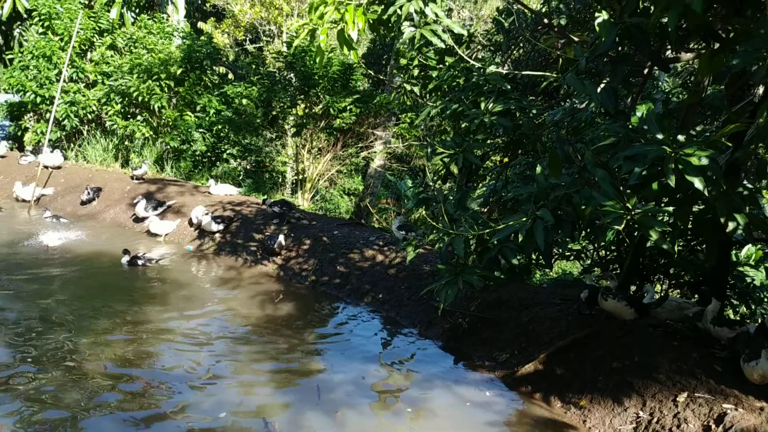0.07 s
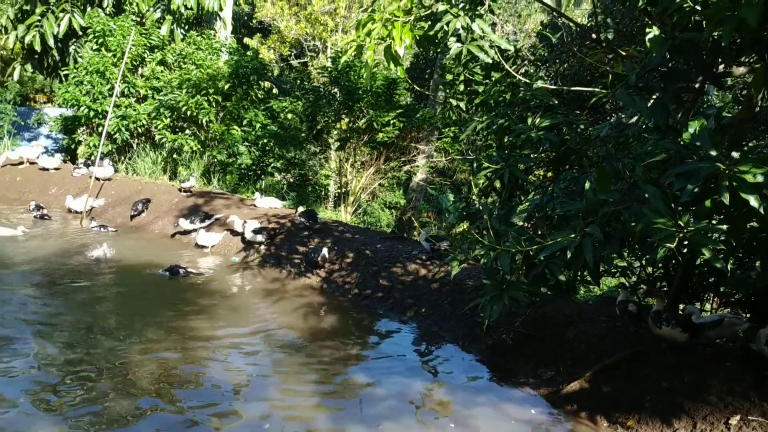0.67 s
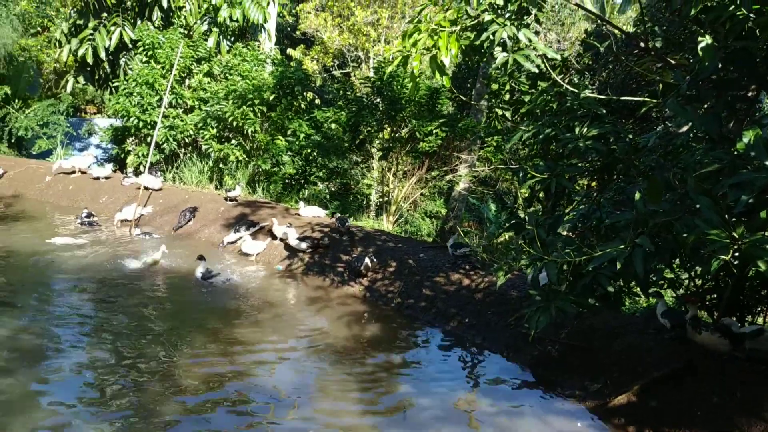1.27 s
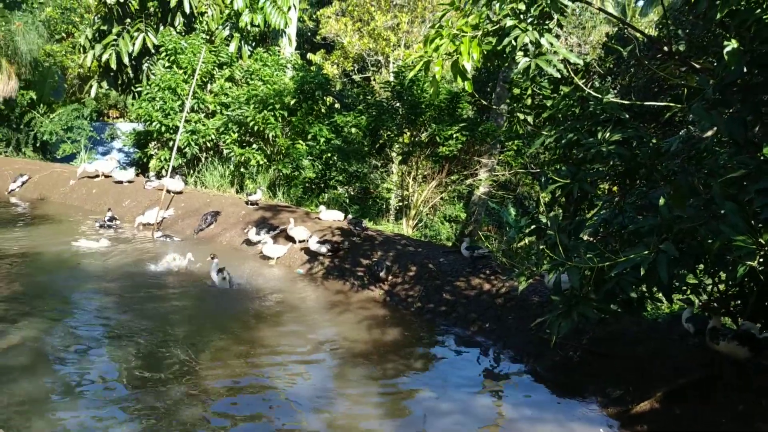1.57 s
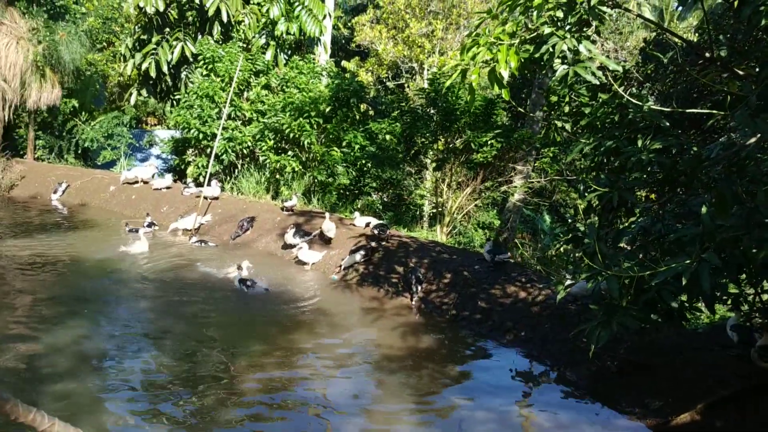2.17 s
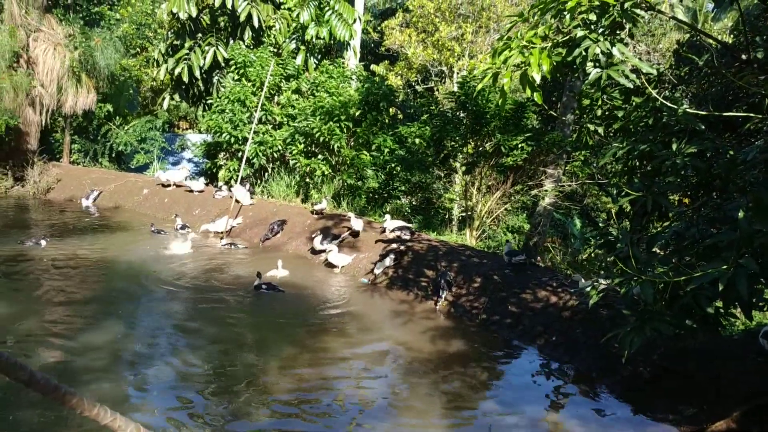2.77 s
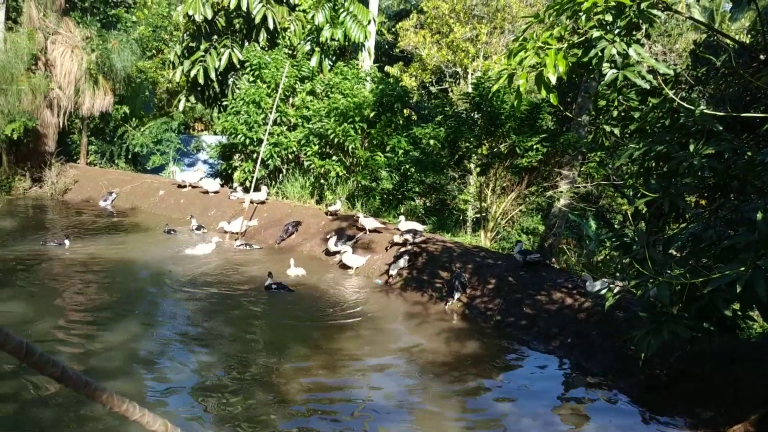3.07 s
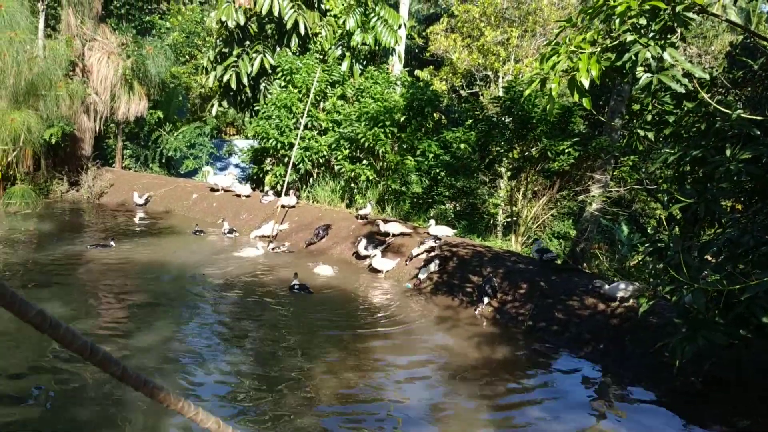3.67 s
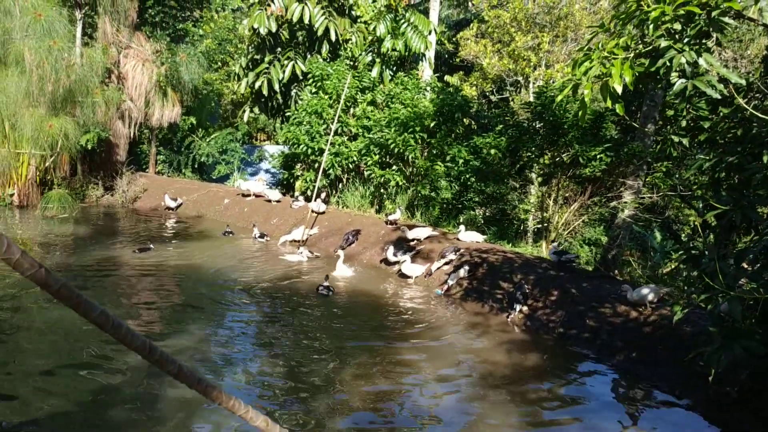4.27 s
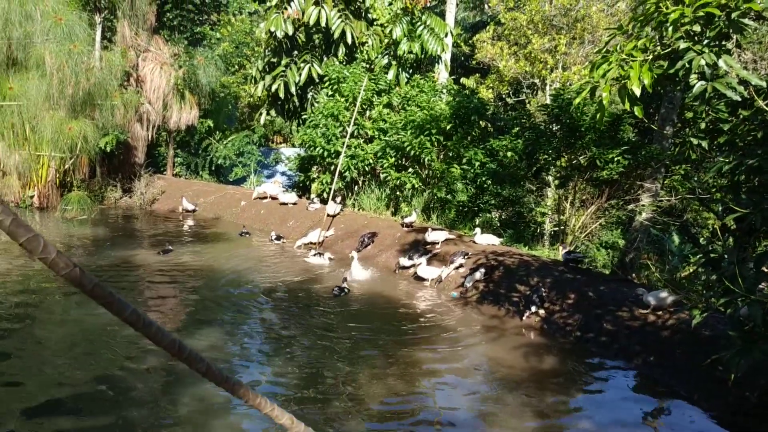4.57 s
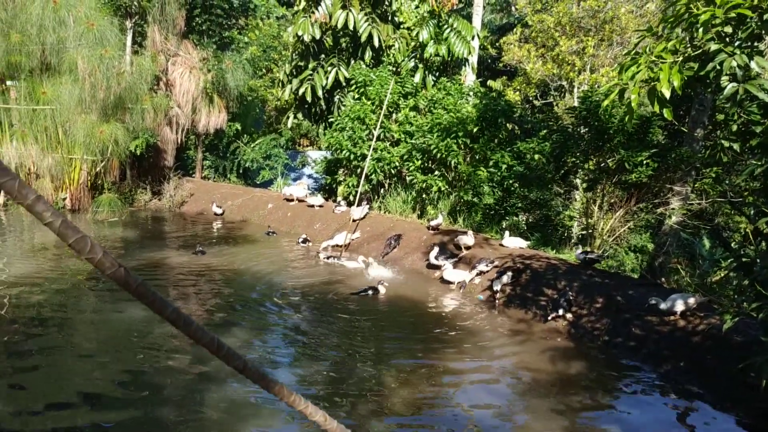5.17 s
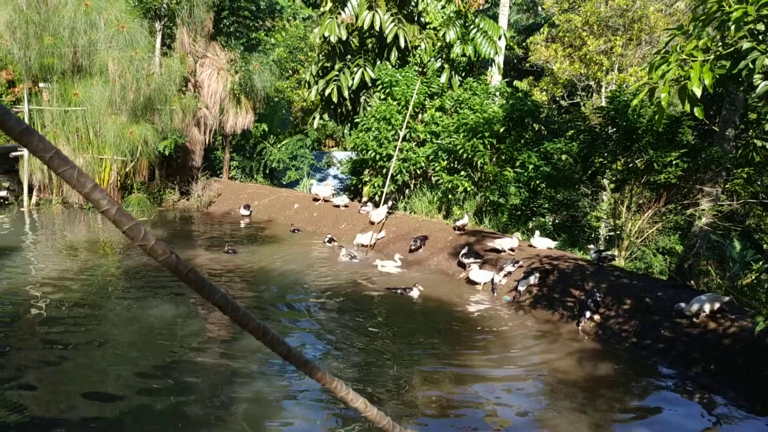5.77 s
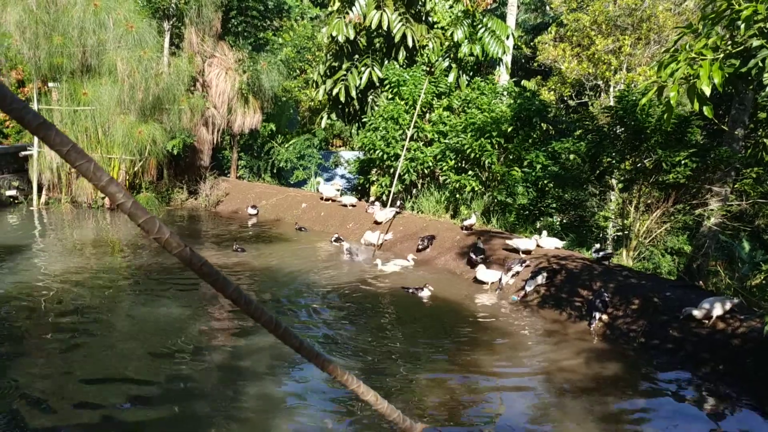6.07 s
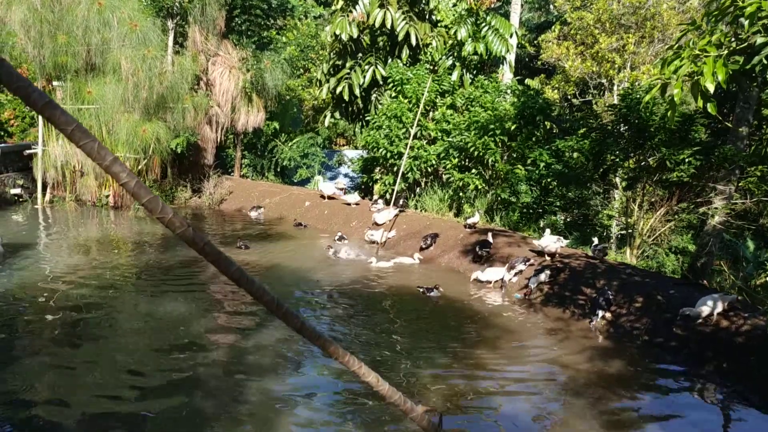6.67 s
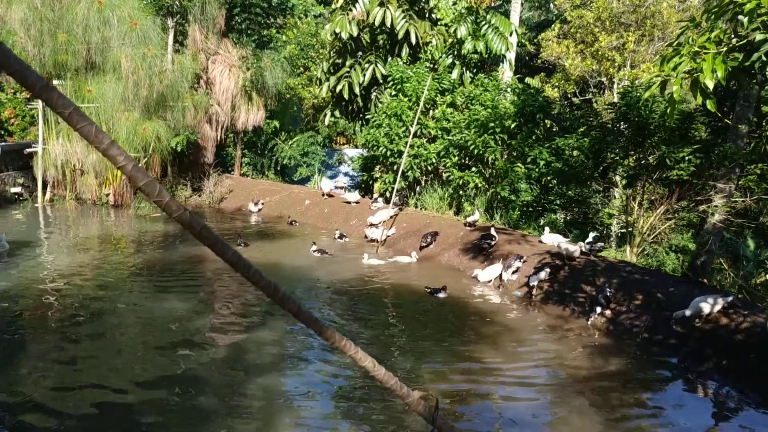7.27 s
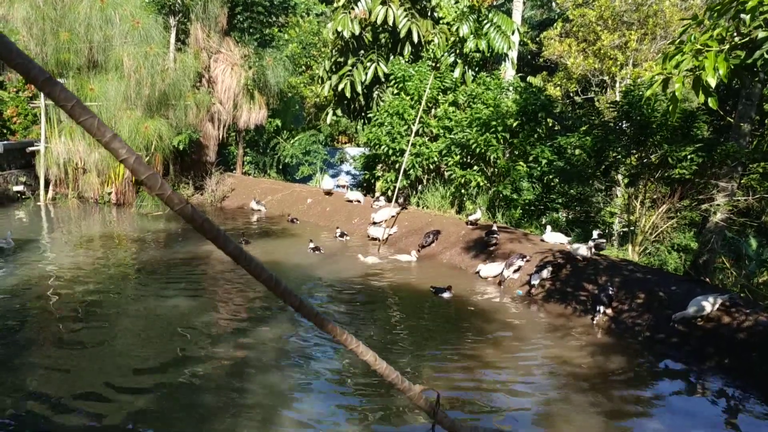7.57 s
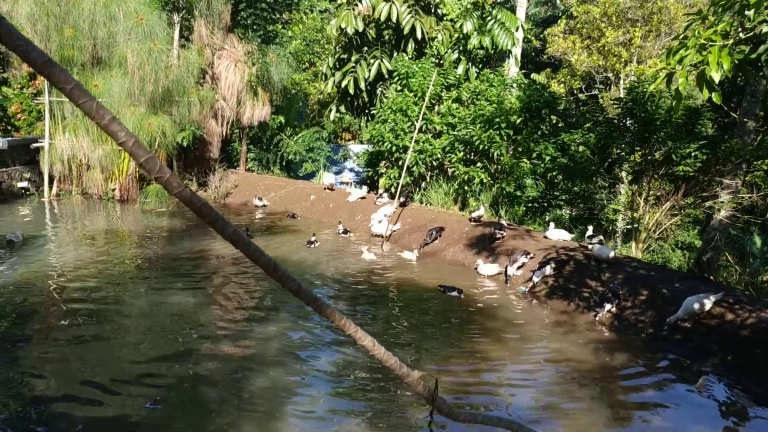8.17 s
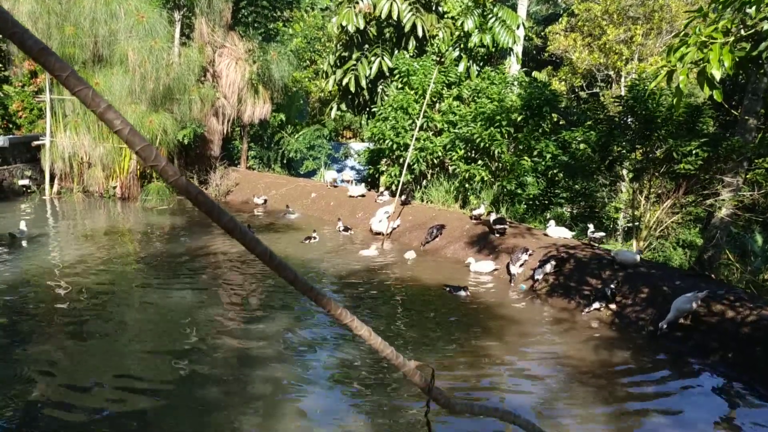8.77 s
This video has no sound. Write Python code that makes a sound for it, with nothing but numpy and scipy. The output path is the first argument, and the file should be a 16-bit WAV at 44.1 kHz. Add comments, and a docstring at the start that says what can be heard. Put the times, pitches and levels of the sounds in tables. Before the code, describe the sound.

Ducks bathe in a pond, their wings slapping the water in four quick bouts with spray, sharp smacks, sloshes and bubbly plops. The first bout is the loudest, and light dabbling fills the gaps. Midway a small bird gives a slowing row of thin, high, rising chirps. Air hisses steadily in the trees behind it all, heard in stereo with a slight echo off the banks.

```python
"""A pond, with ducks bathing at the far side. In four bouts their wings beat the water about eight times
a second: wet slaps and sharp smacks, with spray and gulps made of tiny ringing bubbles. Dipping bodies
slosh and big air pockets plop. A small bird calls a slowing row of thin rising chirps, other birds
whistle and hoot faintly, and behind it all the air hisses steadily in the trees."""
import sys
import numpy as np
from scipy.fft import rfft, irfft, next_fast_len
from scipy.io import wavfile
from scipy.ndimage import map_coordinates

SR = 44100
rng = np.random.default_rng(int(sys.argv[2]) if len(sys.argv) > 2 else 0)


def dump_mix(stems):
    """Bounce the given channels to the path in sys.argv[1] as a 16-bit WAV at rate SR."""
    frames = np.atleast_2d(stems).T  # one column per channel
    limited = np.clip(frames, -1, 1)  # hard clip at full scale
    pcm = np.round(limited * 32767).astype(np.int16)
    wavfile.write(sys.argv[1], SR, pcm)


N = 388962

# Event levels are fader settings, ahead of each layer's own gain and echo.
# Stereo image of two close microphones: f/Hz, left-right likeness (clipped to +-0.99 in use)
LIKENESS = [(60, 4), (150, 1.2), (290, 1.02), (640, 0.5), (1400, -0.27), (3000, 0.06), (7000, 0)]
# Lean of the air and of the water: f/Hz, left minus right/dB
AIR_PAN = [(380, 1), (1300, 0.5), (2400, 2), (4400, 1.5), (8100, 2.5), (11000, -10), (15000, 0.5)]
WATER_PAN = [(200, -1), (700, 1), (1300, 4), (2400, 0), (4400, 7), (8100, 1.5), (15000, -1.5)]
# Bearing of the splashing duck: t/s, left delay/ms
DUCK_BEARING = [(0, 0.45), (3.4, 0.39), (3.9, 0.041), (5.2, 0.031), (8.8, 0.1)]
# Tone of the air, fine spray, underwater gulps, wing slaps, cracks and hollow claps: f/Hz, level/dB
AIR_EQ = [(30, -53), (95, -23), (140, -10.5), (200, 0.5), (340, -1.5), (500, 0), (950, -2), (1300, -4.5),
          (1650, 1), (3100, -3), (4500, -4), (7300, 0), (10500, -11.5), (15500, -12)]
SPRAY_EQ = [(400, -45), (1200, -13.5), (2200, 0), (3300, -4), (4600, -1), (6000, -4), (7500, 0),
            (10000, -3), (15500, -6.5)]
GULP_EQ = [(80, -50), (190, -4), (330, -10.5), (470, -2.5), (650, -6), (880, -1), (1250, -2.5),
           (1900, -0.5), (3500, -37), (8000, -45)]
SLAP_EQ = [(100, -47), (300, -13), (650, -3.5), (1300, -7), (2100, 0.5), (2800, -6.5), (4200, 3),
           (5500, -17), (7500, 3), (15000, -16)]
CRACK_EQ = [(60, -40), (200, -22), (1000, -9), (3000, -4), (4600, 0), (6500, -1.5), (9000, 1), (15500, -13)]
CLAP_EQ = [(80, -45), (250, -1), (600, -12), (1200, 7), (2200, -19), (4500, -1), (9000, -32)]
# Held notes of other birds: t/s, length/s, f/Hz, level/dB
HELD_NOTES = [(0.66, 0.21, 612, -47), (1.384, 0.107, 5980, -31.5)]
# The small bird's call: t/s, length/s, first f/Hz, top f/Hz, closing droop/Hz, level/dB
CHIRP_NOTES = [(3.539, .044, 7000, 7900, 150, -29), (3.645, 0.038, 7040, 7900, 80, -27),
               (3.761, 0.044, 6970, 7900, 350, -28), (3.884, .044, 7050, 7750, 280, -30),
               (4.02, 0.039, 6970, 7760, 0, -32), (4.172, 0.032, 7140, 8100, 0, -29),
               (4.313, .045, 6950, 8100, 0, -30), (4.499, .058, 6700, 8100, 0, -28.5),
               (4.695, .064, 6530, 8250, 0, -30), (4.926, 0.067, 6500, 8130, 0, -31.5),
               (5.206, .059, 6600, 8000, 0, -27), (5.515, 0.058, 6550, 8050, 0, -31),
               (5.903, .054, 6450, 7850, 0, -32.5)]
# Contour of every chirp: share of length, share of climb, level/dB
CHIRP_SHAPE = [(0, 0, -18), (0.12, 0.14, -10), (0.45, 0.6, -1), (0.6, 0.73, -5.5), (0.87, 0.95, -8.5),
               (1, 1, -24)]
# Big bubbles: t/s, f/Hz, level/dB
AIR_POCKETS = [(0.12, 259, -37), (0.982, 780, -25.5), (0.985, 524, -30), (0.987, 980, -29),
               (1.039, 820, -30), (1.135, 470, -34), (1.644, 840, -32), (1.848, 460, -30), (1.94, 550, -32),
               (2.353, 793, -32), (2.797, 274, -35), (2.828, 430, -36), (3.024, 1470, -29.5),
               (3.503, 1444, -31), (4.402, 224, -32.5), (4.587, 509, -28), (5.488, 223, -33),
               (5.603, 1000, -36), (7.608, 240, -35.5), (8.641, 496, -36), (8.748, 880, -39)]
# Water closing over a dipping body: t/s, decay/s, f/Hz, level/dB
BODY_DIPS = [(0.993, 0.02, 745, -32.5), (1.061, 0.023, 260, -40), (1.14, 0.038, 750, -34.5),
             (1.855, .01, 620, -30.5), (2.83, 0.047, 360, -36.5), (2.891, 0.018, 270, -41),
             (4.594, 0.011, 615, -39), (4.83, 0.014, 700, -36), (5.144, 0.0072, 620, -29),
             (5.153, .008, 260, -37), (5.645, 0.0092, 720, -37), (6.851, 0.0084, 720, -35),
             (7.6, .01, 600, -40), (7.795, 0.0089, 800, -41)]
# A wing or bill landing flat: t/s, crack level/dB, clap level/dB, crack peak f/Hz, crack decay/s
FLAT_HITS = [(0.065, -26, -42, 5500, .003), (0.902, -20, -36, 5700, .0015),
             (0.94, -11.5, -42, 4500, 0.0012), (0.974, -17, -44, 9600, 0.0013),
             (1.056, -20, -26, 4900, 0.0027), (1.129, -25, -34, 4400, .003),
             (1.188, -24, -36, 4600, 0.0018), (1.477, -15.5, -35, 5200, 0.0025),
             (1.5555, -15.5, -32, 4900, .0013), (1.683, -26, -32, 4500, .0015),
             (1.699, -21, -36, 5000, 0.0027), (1.807, -24, -40, 2330, 0.0027),
             (1.821, -25, -36, 3030, 0.0035), (1.938, -27, -23, 4580, 0.0044), (2.07, -20, -38, 3000, .003),
             (2.308, -27, -42, 4630, .004), (2.722, -28, -42, 6000, .004), (2.864, -16.5, -45, 4700, .0007),
             (2.87, -18, -40, 7860, .0007), (2.992, -26, -42, 8040, 0.0035), (3.12, -19, -34, 7000, .001),
             (3.256, -23, -35, 6500, .004), (3.4, -27, -45, 4700, .002), (4.178, -23, -50, 7400, .002),
             (4.7145, -17, -28, 3500, .001), (5.137, -19.5, -23.5, 1380, .0018),
             (5.144, -28, -38, 1210, .002), (7.456, -28, -40, 4280, 0.0035), (8.641, -23, -39, 3000, .0005)]
# A wing cutting into the water: t/s, level/dB, decay/s
WING_CUTS = [(0.222, -37, 0.018), (0.94, -22, 0.0023), (1.28, -32, .025), (1.405, -23.5, .01),
             (1.5555, -22.5, .006), (1.586, -25, .01), (1.698, -21.5, .008), (1.804, -22, .008),
             (2.047, -27, .004), (2.07, -28, 0.011), (2.575, -30, .008), (2.715, -31, .014),
             (2.97, -33, 0.011), (3.12, -31, 0.01), (3.213, -31, .012), (3.254, -31, .008),
             (3.399, -37, 0.0066), (3.925, -30, .006), (4.442, -31, .025), (4.59, -36, 0.011),
             (4.712, -24, .01), (4.732, -25, .01), (4.851, -28, 0.012), (4.99, -34, 0.011),
             (5.008, -30, .01), (5.138, -29, .008), (5.158, -28, 0.0082), (5.48, -29, .008),
             (5.553, -31, .009), (5.745, -31.5, 0.021), (5.856, -30, 0.013), (5.964, -28, .024),
             (6.065, -27.5, 0.019), (6.106, -32, .02), (6.197, -30.5, 0.036), (6.337, -29, .014),
             (6.358, -29, 0.014), (6.46, -26.5, 0.02), (6.582, -25.5, 0.018), (6.645, -27, .006),
             (6.701, -29, .028), (6.844, -32, 0.017), (7.456, -33, 0.0062), (7.785, -34, .01)]
# Bed of other ducks dabbling: t/s, spray level/dB, gulp level/dB
DABBLING = [(0, -41.5, -43), (0.3, -44, -43.5), (0.6, -47.5, -48), (1.2, -36, -36.5), (2.3, -43, -40),
            (2.5, -42.5, -47), (3.9, -41, -45.5), (5.5, -41, -46), (7.5, -42.5, -47.5), (8.3, -44, -51.5),
            (8.82, -41.5, -48.5)]
# Lone splashes and accents within a bout: t/s, spray level/dB, gulp level/dB, decay/s
PLUNGES = [(0.068, -34.5, -45, 0.055), (0.236, -39, -51, 0.022), (0.904, -35, -33, 0.022),
           (0.972, -33, -44, 0.02), (0.992, -43, -34, 0.024), (1.132, -37, -32, 0.035),
           (1.37, -45, -40, 0.022), (1.453, -27.5, -48, 0.02), (1.675, -28, -31.5, 0.027),
           (1.822, -26, -45, 0.036), (2.16, -33, -44, 0.073), (2.355, -39, -36, 0.025),
           (2.728, -33, -51, 0.02), (3.257, -34, -35, 0.012), (4.178, -32, -54, 0.021),
           (4.726, -31, -39, 0.032), (5.55, -42, -43, 0.14), (6.98, -38, -52, 0.033),
           (7.056, -39, -43, 0.027), (8.1, -37.5, -52, 0.041), (8.41, -44, -56, 0.02),
           (8.525, -40, -53, 0.013), (8.65, -45, -41, 0.02), (8.68, -40, -49, 0.015),
           (8.76, -45, -40, 0.02)]
# Bouts of wing beats: first t/s, last t/s, beats, slowing (0-1), spray level/dB, gulp level/dB,
# spray ramp/dB, gulp ramp/dB (both first beat to last), mid-bout swell/dB, churn level/dB
WING_BOUTS = [(0.934, 2.065, 10, 0, -32, -39.5, 1.5, -3, 0.5, -36),
              (2.36, 3.402, 9, 0.12, -37.5, -46, 0, -5, 2, -44),
              (4.462, 5.309, 7, 0.13, -36.5, -48.5, 0, -14, 4, -43.5),
              (5.753, 6.86, 10, 0.08, -37, -47, 5, 12, 2.5, -42.5)]


def amp(db):
    """Decibels to gain."""
    return 10 ** (np.asarray(db) / 20)


def unit(x):
    """x at rms 1."""
    return x / np.sqrt(np.mean(x ** 2) + 1e-20)


def along(points, hz):
    """(Hz, value) points read on a log axis."""
    f, v = np.transpose(points)
    return np.interp(np.log(hz + 1), np.log(f + 1), v)


def automation(rows):
    """One value per sample for each column after the time."""
    times, *columns = np.transpose(rows)
    return [np.interp(np.arange(N) / SR, times, column) for column in columns]


def wobble(rate):
    """A smooth random curve, rate knots a second."""
    knots = rng.standard_normal(int(N * rate / SR) + 4)
    coarse = np.arange(0, N, 32)
    return np.interp(np.arange(N), coarse, map_coordinates(knots, [coarse * rate / SR]))


def swell(u, rise=0.68):
    """Splash envelope peaking at u = 0; u and rise are counted in decay times."""
    return np.exp(np.minimum(u / rise, -u))


def filtered(x, response):
    """x through a frequency response."""
    m = next_fast_len(N + 8192)
    return irfft(rfft(x, m) * response(np.fft.rfftfreq(m, 1 / SR)), m)[..., :N]


def low_cut(x):
    """Steep roll-off below 160 Hz."""
    return filtered(x, lambda hz: 1 - 1 / (1 + (hz / 160) ** 6))


def add(track, s, sound):
    """Mix a sound into a track from time s."""
    part = track[max(round(s * SR), 0):][:len(sound)]
    part += sound[:len(part)]


def direct(x, lag_ms):
    """The straight path, reaching the left microphone later."""
    late = np.arange(N) - np.round(lag_ms * SR / 1000).astype(int)
    return np.array([x[np.clip(late, 0, N - 1)], x])


def banks(x, t60, block=4096):
    """Scattered echoes off the banks; water and birds move, so each block gets a fresh tail."""
    pieces = np.pad(x, (0, -N % block)).reshape(-1, block)
    t = np.arange(block) / SR
    tails = rng.standard_normal((2, len(pieces), block)) * amp(-60 * t / t60) * (1 - np.exp(-t / 0.0032))
    tails /= np.linalg.norm(tails, axis=-1, keepdims=True)
    echo = irfft(rfft(pieces, 2 * block) * rfft(tails, 2 * block))
    now, spill = echo[..., :block].reshape(2, -1), echo[..., block:].reshape(2, -1)
    return (now + np.pad(spill, ((0, 0), (block, 0)))[:, :-block])[:, :N]


def stereo_eq(pair, eq, pan):
    """Colour a pair, at rms 1; close microphones hear the bass alike, and each band leans to one side."""
    m = next_fast_len(N + 8192, True)
    hz = np.fft.rfftfreq(m, 1 / SR)
    left, right = rfft(pair.astype(np.float32), m)
    alike = np.clip(along(LIKENESS, hz), -.99, .99)
    mid, side = (left + right) * np.sqrt(1 + alike), (left - right) * np.sqrt(1 - alike)
    gain = amp(along(eq, hz) + np.outer([.5, -.5], along(pan, hz)))
    return unit(irfft(np.array([mid + side, mid - side]) * gain, m)[:, :N])


def air():
    """The bed: steady hiss in the trees, with a low murmur that swells and sinks."""
    murmur_eq = [(100, -45), (180, -4.5), (235, 0), (320, -8), (600, -31), (3000, -70)]  # f/Hz, level/dB
    hiss = stereo_eq(rng.standard_normal((2, N)), AIR_EQ, AIR_PAN)
    murmur = stereo_eq(rng.standard_normal((2, N)), murmur_eq, AIR_PAN)
    return hiss * amp(-36 + 0.15 * wobble(3.13)) + murmur * amp(-54 + 3.8 * wobble(14))


def whistles(scoop=0.05, waver=0.0039, rough_db=1.5):
    """Far birds hold slightly rough notes that scoop up to pitch, blurred by echoes."""
    track, unsteady = np.zeros(N), wobble(100)
    for s, length, hz, db in HELD_NOTES:
        u = np.linspace(0, 1, int(length * SR))
        pitch = hz * (1 - scoop * np.exp(-u / 0.152) + waver * unsteady[:len(u)])
        arch = np.abs(np.sin(np.pi * u)) ** 0.53
        add(track, s, amp(db) * arch * np.sin(2 * np.pi * np.cumsum(pitch) / SR))
    track *= amp(rough_db * wobble(300))
    return direct(track, lag_ms=0.19) + amp(-1) * banks(track, t60=0.12)


def chirps():
    """The small bird: each chirp glides up, peaks midway and may hook down; pitch and level quaver."""
    track = np.zeros(N)
    share, climb, shape_db = np.transpose(CHIRP_SHAPE)
    quaver_hz = 55 * wobble(350) + 35 * wobble(90)
    for s, length, first_hz, top_hz, droop_hz, db in CHIRP_NOTES:
        u = np.linspace(0, 1, int(length * SR))
        glide = first_hz + (top_hz - first_hz) * np.interp(u, share, climb) - droop_hz * u ** 4
        hz = glide + quaver_hz[int(s * SR):][:len(u)]
        envelope = amp(db + np.interp(u, share, shape_db))
        add(track, s, envelope * np.sin(2 * np.pi * np.cumsum(hz) / SR))
    track *= amp(2.6 * wobble(220))
    return amp([[2.5], [0]]) * (direct(track, lag_ms=.27) + amp(-2.5) * banks(track, t60=.13))


def plops(rise=0.058, flutter=0.71):
    """Big air pockets ring briefly and unevenly, bending up as they near the surface."""
    t, track = np.arange(SR // 8) / SR, np.zeros(N)
    attack = (1 - np.exp(-t / 0.0013)) ** 2
    for s, hz, db in AIR_POCKETS:
        decay = 0.012 * (500 / hz) ** 0.28  # larger, lower bubbles ring longer
        phase = 2 * np.pi * np.cumsum(hz * (1 + rise * t / decay)) / SR
        add(track, s, amp(db + 1.5) * attack * np.exp(-t / decay) * np.sin(phase))
    track *= 1 + flutter * wobble(120)
    return low_cut(direct(track, lag_ms=0) + amp(-12) * banks(track, t60=0.17))


def sloshes(width_octaves=0.92):
    """A body dips and its cavity breaks into like-sized pockets that boom together: a hollow noise band."""
    t, track = np.arange(SR // 2) / SR, np.zeros(N)
    grid, middle = np.fft.rfftfreq(len(t), 1 / SR), t[-1] / 2
    for s, decay, hz, db in BODY_DIPS:
        band = np.exp(-(np.log2((grid + 1) / hz) / width_octaves) ** 2 / 2)
        envelope = swell((t - middle) / decay)
        boom = irfft(rfft(rng.standard_normal(len(t))) * band, len(t)) * envelope
        add(track, s - middle, amp(db) * unit(boom) * np.sqrt(np.mean(envelope ** 2)))
    return low_cut(direct(track, lag_ms=0) + amp(-12) * banks(track, t60=0.064))


def smacks(peak_db=13.5, peak_octaves=0.33):
    """A wing or bill lands flat: a short crack with a bright peak at its own pitch, over a hollow clap."""
    t, hits = np.arange(SR // 20) / SR, np.zeros(N)
    grid = np.fft.rfftfreq(2 * len(t), 1 / SR)

    def burst(colour_db, decay_s):
        """Coloured noise that starts near rms 1 and dies away."""
        noise = irfft(rfft(rng.standard_normal(2 * len(t))) * amp(colour_db))[:len(t)]
        fade = np.exp(-t / decay_s)
        return unit(noise * fade) * np.sqrt(np.mean(fade ** 2))

    for s, crack_db, clap_db, hz, decay in FLAT_HITS:
        crack_peak_db = peak_db * np.exp(-(np.log2((grid + 1) / hz) / peak_octaves) ** 2)
        crack = burst(along(CRACK_EQ, grid) + crack_peak_db, decay)
        clap = burst(along(CLAP_EQ, grid), decay_s=0.0031)
        add(hits, s, amp(crack_db) * crack + amp(clap_db) * clap)
    heard = direct(hits, automation(DUCK_BEARING)[0]) + amp(-6) * banks(hits, t60=0.09)
    # a small surface radiates little bass
    return amp([[2], [-2]]) * filtered(heard, lambda hz: hz ** 2 / (hz ** 2 + 300 ** 2))


def bubbles(count, samples, pitch_hz, spread, cycles, scatter_db):
    """A random cloud of bubbles, each bending up in pitch and falling by 1/e in about `cycles` turns."""
    start = rng.integers(0, N, (count, 1))
    hz = np.clip(pitch_hz * np.exp(spread * rng.standard_normal((count, 1))), 150, SR / 3)
    strength = amp(scatter_db * np.minimum(rng.exponential(size=(count, 1)), 4))
    turns = hz * np.arange(samples) / SR
    age = turns / cycles
    bend = 1 + 0.027 * np.minimum(age, 4)
    ring = strength * np.sqrt(hz) * np.exp(-age) * np.sin(2 * np.pi * turns * bend)
    return np.bincount((start + np.arange(samples)).ravel(), ring.ravel(), N)[:N]


def water(cloud, eq, wash_db, direct_db):
    """Wet texture: bubbles heard straight and off the banks, over a noise wash of countless tinier ones."""
    cloud = unit(cloud)
    straight = amp(direct_db) * direct(cloud, automation(DUCK_BEARING)[0])
    wash = amp(wash_db) * rng.standard_normal((2, N))
    return stereo_eq(straight + banks(cloud, t60=0.065) + wash, eq, WATER_PAN)


def slaps(attack_s=0.001):
    """A wing cuts in and tears the surface into coarse drops: a sudden, dull, wet burst."""
    t, power = np.arange(SR // 5) / SR, np.zeros(N)
    for s, db, decay in WING_CUTS:
        add(power, s, (amp(db) * (1 - np.exp(-t / attack_s)) * np.exp(-t / decay)) ** 2)
    drops = bubbles(count=14000, samples=96, pitch_hz=2600, spread=.65, cycles=1.3, scatter_db=2.5)
    return np.sqrt(power) * water(drops, SLAP_EQ, wash_db=-1, direct_db=-2.5)


def churn(rise_s=0.2, settle_s=0.32):
    """Power of the stirred water: it builds into each bout and settles after the last beat."""
    t, power = np.arange(N) / SR, np.zeros(N)
    for first, last, *_, churn_db in WING_BOUTS:
        build = 1 - np.exp(-np.maximum(t - first + rise_s, 0) / rise_s)
        settle = np.exp(-np.maximum(t - last, 0) / settle_s)
        power += (amp(churn_db) * build * settle) ** 2
    return power


def wing_beats(decay_s=0.046):
    """One splash cue per beat, laid out like PLUNGES; a bout swells midway and may drag towards its end."""
    for first, last, count, slowing, spray_db, gulp_db, spray_ramp, gulp_ramp, swell_db, _ in WING_BOUTS:
        for u in np.linspace(0, 1, round(count)):
            s = first + (last - first) * (u - slowing * u * (1 - u))
            effort_db = swell_db * np.sin(np.pi * u)
            yield (s, spray_db + effort_db + spray_ramp * (u - .5),
                   gulp_db + effort_db + gulp_ramp * (u - .5), decay_s)


def splashing():
    """Each beat or plunge throws up spray and drives gulps of air under, over churn and dabbling."""
    t, stirred = np.arange(N) / SR, churn()
    dabble_spray_db, dabble_gulp_db = automation(DABBLING)
    spray_power = stirred * amp(2.1 * wobble(32)) ** 2 + amp(dabble_spray_db + 1.7 * wobble(40)) ** 2
    gulp_power = (stirred * amp(-3.5) ** 2 + amp(dabble_gulp_db) ** 2) * amp(1.2 * wobble(24)) ** 2
    for s, spray_db, gulp_db, decay in [*wing_beats(), *PLUNGES]:
        span = slice(max(int((s - .3) * SR), 0), int((s + .4) * SR))
        envelope = swell((t[span] - s) / decay)
        spray_power[span] += (amp(spray_db) * envelope) ** 2
        gulp_power[span] += (amp(gulp_db) * envelope) ** 2
    mist = bubbles(count=12000, samples=48, pitch_hz=6110, spread=0.6, cycles=1.8, scatter_db=4)
    drops = bubbles(count=700, samples=96, pitch_hz=7000, spread=0.507, cycles=1.9, scatter_db=3)
    runoff = bubbles(count=3600, samples=256, pitch_hz=2900, spread=0.45, cycles=4.5, scatter_db=1.5)
    pockets = bubbles(count=3200, samples=500, pitch_hz=1050, spread=.58, cycles=2.3, scatter_db=2)
    # fine mist on top, heavy drops and the trickle off the feathers tucked under it
    droplets = unit(mist) + amp(-4.5) * unit(drops) + amp(-10.5) * unit(runoff)
    spray = amp(2.5) * np.sqrt(spray_power) * water(droplets, SPRAY_EQ, wash_db=-2.5, direct_db=-6)
    gulp = np.sqrt(gulp_power) * water(pockets, GULP_EQ, wash_db=6.5, direct_db=-5)
    return spray + gulp


def scene():
    """The mix: bathing ducks, birds and air."""
    return splashing() + slaps() + smacks() + sloshes() + plops() + chirps() + whistles() + air()


def record(dry, top_hz=15900):
    """A brick-wall high cut on the whole mix."""
    return filtered(dry, lambda hz: hz < top_hz)


dry = scene()
out = record(dry)
dump_mix(out)
```